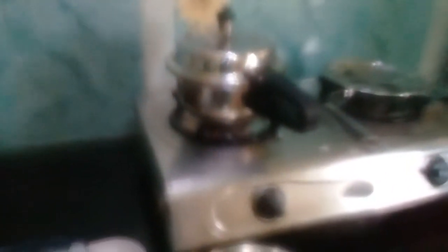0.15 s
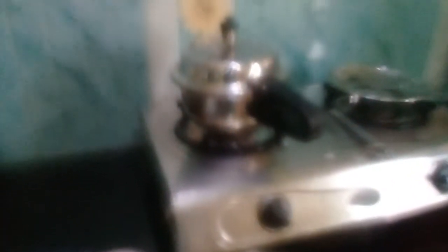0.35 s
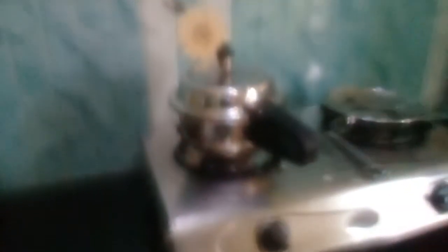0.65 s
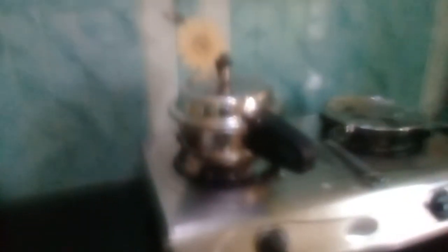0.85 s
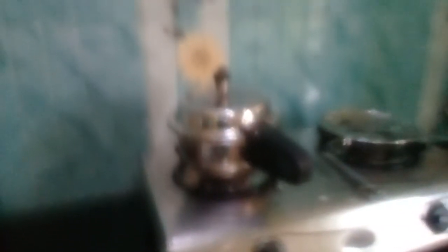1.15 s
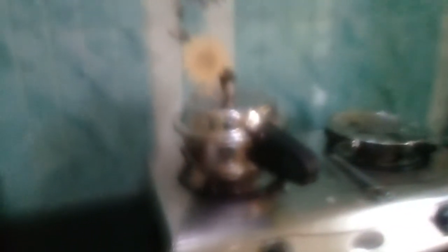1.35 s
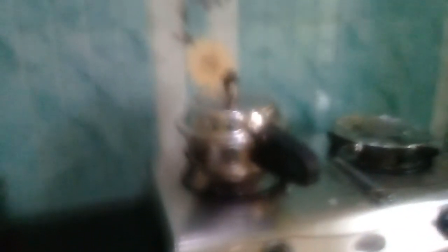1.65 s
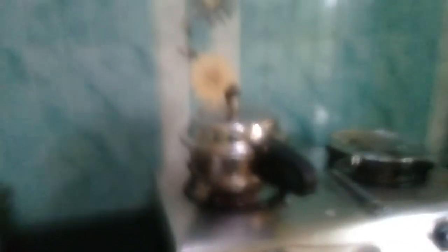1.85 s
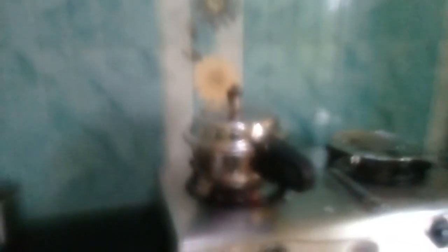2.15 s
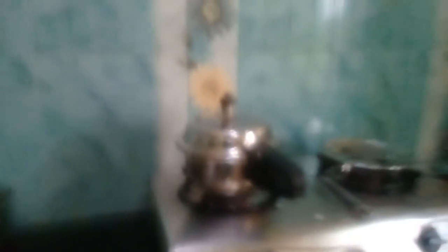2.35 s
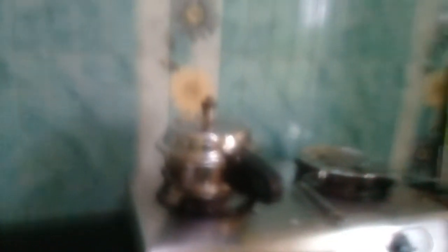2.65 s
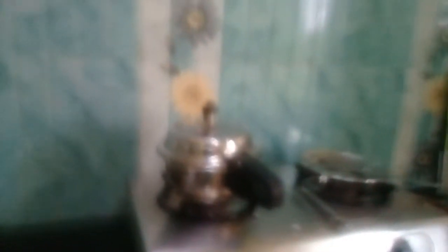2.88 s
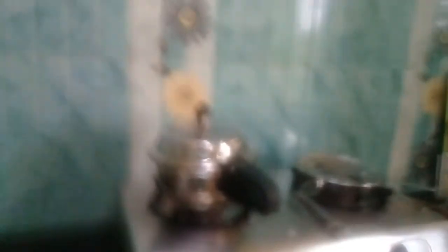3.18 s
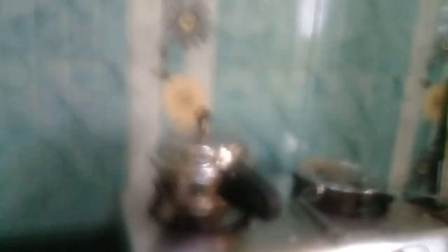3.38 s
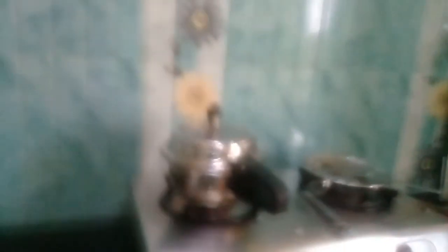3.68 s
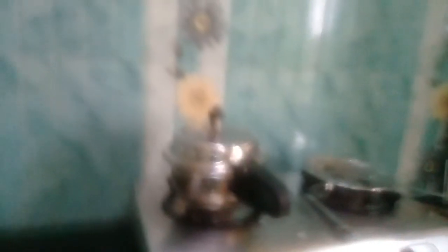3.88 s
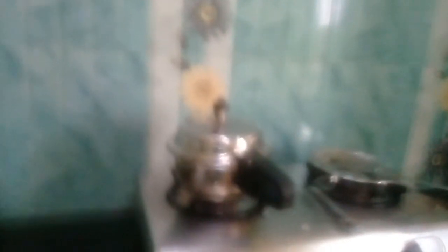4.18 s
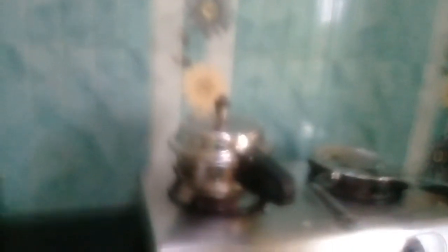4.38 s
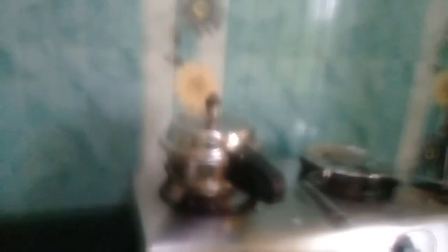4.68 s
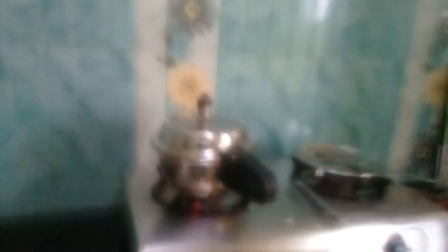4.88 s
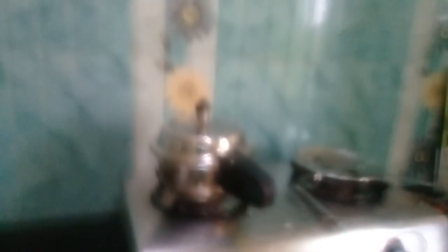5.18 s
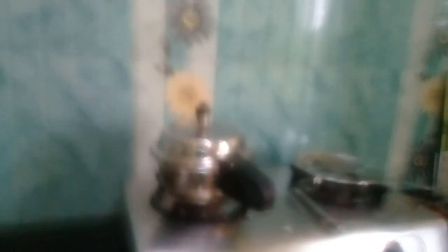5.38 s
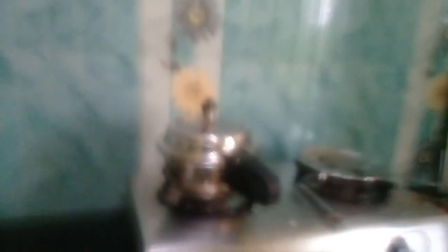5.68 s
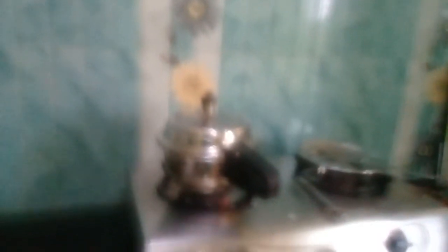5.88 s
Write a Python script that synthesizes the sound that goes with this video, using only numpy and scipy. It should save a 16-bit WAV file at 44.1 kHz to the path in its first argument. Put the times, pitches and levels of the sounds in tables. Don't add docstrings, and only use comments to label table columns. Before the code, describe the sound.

A pressure cooker heats on a gas stove in a tiled kitchen. A barely audible leak opens into a hiss that grows steadily, fluttering as the vent weight rocks, with breathy wheezes now and then. Near the end come a cluster of soft wooden knocks and one sharper tap. Low mains hum, burner flutter and room air lie behind, heard by a handheld microphone.

```python
import sys
import numpy as np
from scipy import signal
from scipy.fft import rfft, irfft, next_fast_len
from scipy.io import wavfile
from scipy.ndimage import uniform_filter1d, map_coordinates

SR = 44100
rng = np.random.default_rng(int(sys.argv[2]) if len(sys.argv) > 2 else 0)


def to_wav(s):
    ch = np.atleast_2d(s).T
    pcm = np.round(np.clip(ch, -1, 1) * 32767)
    wavfile.write(sys.argv[1], SR, pcm.astype(np.int16))


def voltage_ratio(level):
    return 10 ** (np.asarray(level, float) / 20)


N = 265923

# t/s, level/dB
PRESSURE = [
    (0, -60),
    (.3, -57),
    (.8, -51.5),
    (1.3, -48.5),
    (1.7, -46),
    (2.5, -44),
    (3.5, -41.5),
    (4.5, -38.5),
    (6.03, -38),
]
# t/s, change of jet level/dB, half length/s
ROCKS = [(.752, -2, 0.019), (1.305, -2, 0.061), (1.46, 1.5, .015), (1.66, 1.5, .015), (1.72, -2, .017),
         (2.159, -2, .032), (2.323, 5, 0.011), (2.372, -1, .014), (2.61, -2.5, .014), (2.663, 1.8, .017),
         (2.765, 0.5, .014), (2.826, -3.5, .015), (2.88, 1.7, .015), (3.03, 0.5, .03), (3.66, -1, 0.023),
         (3.46, -1, .025), (3.715, 1.5, 0.012), (3.89, -3, .016), (3.99, 1.4, .031), (4.179, -3, .025),
         (4.377, -0.8, .019), (4.524, 3, .025), (4.6, -2, 0.011), (4.711, -1, 0.016), (4.81, 0, .02),
         (5.104, -0.5, .019), (5.18, 1.5, 0.013), (5.236, -2.4, .015), (5.89, 2.5, 0.02),
         (5.975, -2.5, 0.016)]
# t/s, change of level/dB, half length/s
BOIL = [
    (.95, 5.5, 0.26),
    (2.0, -4, .08),
    (2.55, 3, .1),
    (3.1, -2, .15),
    (3.85, 1, 0.11),
    (5.25, -1, 0.23),
    (5.9, 2, 0.11),
]
# t/s, change of level/dB, half length/s
SINGS = [
    (.95, 1, .12),
    (1.2, -6, 0.087),
    (2.15, -2, .1),
    (2.55, 3, .15),
    (3.3, 1, .15),
    (3.65, -8, .08),
]
# f/Hz, density level/dB
JET_SPECTRUM = [(4200, -29), (5000, -6.5), (5600, -3.5), (6130, -2), (7040, -1), (7810, -2.5), (9740, -1),
                (10400, -4), (11200, -8.5), (12500, -39)]
# f/Hz, density level/dB
THROAT_SPECTRUM = [(1400, -41), (1650, -8.5), (1850, -3.5), (2200, -5), (2650, -2), (3500, 1), (4500, 0.5),
                   (5100, -2.5), (6000, -10), (7500, -56)]
# f/Hz, density level/dB
ROAR_SPECTRUM = [(350, -24), (600, -7), (850, -5.5), (1120, 1.5), (1350, -0.5), (1550, -2.5), (1900, -8),
                 (3000, -76)]
# f/Hz, density level/dB
FIZZ_SPECTRUM = [(9500, -59), (10800, -2), (11500, -4), (12100, 2.5), (12700, -1.5), (13500, 1),
                 (14200, -5), (15000, -1), (15600, 2), (16000, -11)]
# f/Hz, width/Hz, level/dB
VENT_HOLLOWS = [(2104, 550, 4), (2390, 140, -2), (2666, 430, 2), (3600, 300, 1), (4476, 120, 2),
                (5100, 140, -2.5), (6270, 280, 3), (7000, 640, -1.5), (7700, 340, 4.5), (8260, 180, 4),
                (8400, 380, -0.5), (9170, 190, 2.5), (9890, 270, 3), (10500, 210, 1), (11600, 260, 7),
                (12500, 300, 5.5), (12940, 300, 4.5), (13770, 320, 5)]
# t of top/s, hold/s, level/dB, sag in mid hold/dB, rise/(dB per s)
WHEEZES = [
    (-.01, 0.0062, -48, -2, 120),
    (0.624, 0.25, -51.5, 3, 152),
    (1.8, 0.25, -49.5, 3, 93),
    (2.575, .01, -52, 4, 140),
    (3.38, 0.1, -54, 2.5, 260),
    (3.703, 0.042, -46, 3, 1500),
    (5.165, 0.11, -47.5, 3, 250),
]
# f/Hz, width/Hz, level/dB
GAPS = [
    [(2830, 177, -5), (3180, 120, -2.5), (3660, 140, -1.5), (4222, 130, -3.5), (4570, 330, -12.5)],
    [(2484, 180, -10), (2826, 82, 4), (3200, 440, -2.5), (3560, 140, 3), (4020, 120, -5), (4460, 320, -19)],
    [(2860, 230, -3), (3280, 250, -5), (3430, 130, -2), (3610, 120, -2.5), (4070, 55, -8)],
    [(2850, 85, 15), (3540, 150, 7.5)],
    [(2610, 110, 9), (3500, 180, -22)],
    [(2370, 680, 5), (3570, 830, 4), (4430, 600, 3)],
    [(2714, 300, 0), (3600, 1100, -1)],
]
# t/s, peak level/dB, f/Hz, t60/s
KNOCKS = [(4.339, -35, 397, 0.05), (4.339, -45, 150, 0.04), (4.347, -45, 405, 0.069),
          (4.38, -33, 423, 0.063), (4.403, -44, 450, 0.082), (4.414, -39.5, 465, 0.04),
          (4.427, -43.5, 402, 0.13), (4.475, -37, 500, 0.049), (4.513, -38, 385, 0.025),
          (5.7128, -27, 1154, 0.011), (5.716, -34.5, 1055, 0.03), (5.713, -41, 920, 0.044),
          (5.715, -39, 1330, 0.035), (5.72, -38, 1940, .022), (5.731, -38, 1000, 0.02),
          (5.748, -38, 1100, 0.024)]
# f/Hz, t60/s
TILES = [(200, 0.48), (2000, 0.94), (10000, 0.37)]
# f/Hz, width/Hz, level/dB
BURNER_HOLLOWS = [(200.6, 41.6, 0), (240, 61, -2.5), (258.8, 9.8, 2)]
# t/s, change of level/dB, half length/s
FLARES = [
    (0.314, 7, 0.27),
    (1.0, 5.4, 0.24),
    (1.467, 3.5, 0.44),
    (2.255, 7.5, 0.22),
    (2.982, 4.5, 0.19),
    (3.826, 8, 0.25),
    (4.385, 8.5, 0.19),
    (5.168, 3, 0.18),
    (5.812, 6, 0.28),
]
# f/Hz, density level/dB
AIR_SPECTRUM = [(15, -70), (30, -43), (62, -26), (85, -12.5), (193, -13), (475, -17), (580, -22),
                (800, -20.5), (1100, -27.5), (1500, -25.5), (2000, -31), (3000, -40), (6600, -120)]
# t/s, change of level/dB, half length/s
DRAUGHTS = [(.6, 2, 0.19), (1.7, 2, 0.14), (2.4, 2, 0.16), (2.92, 5, 0.14), (3.35, 3.5, 0.061),
            (3.62, -2.5, 0.055), (3.9, 4.5, .15), (5.2, -1, 0.13), (4.53, 9.5, 0.066), (4.8, 4, 0.11),
            (5.8, 1.5, .3)]
# t/s, level/dB, half length/s
LOW_SWELLS = [(0.061, 16, 0.11), (0.428, 3.5, 0.035), (0.561, 15, 0.096), (0.779, 10.3, 0.074),
              (1.024, 14, 0.093), (1.513, 9.1, 0.11), (1.782, 12.3, 0.059), (2.152, 12, 0.14),
              (2.547, 12.5, 0.066), (2.854, 13.5, 0.056), (3.101, 12, 0.059), (3.411, 14.1, 0.15),
              (3.754, 16.7, 0.092), (4.002, 15, 0.056), (4.319, 15.5, 0.12), (4.573, 12, 0.058),
              (4.876, 11, 0.104), (5.163, 15.5, 0.063), (5.482, 11, 0.13), (5.919, 13, 0.155)]
# t/s, level/dB, half length/s
HIGH_SWELLS = [(0.11, 7.9, 0.14), (0.375, 14, 0.15), (0.759, 17, 0.096), (1.051, 13.3, 0.1),
               (1.379, 11.5, 0.12), (1.796, 17, 0.08), (2.141, 13, 0.09), (2.486, 13.9, 0.094),
               (2.88, 18.3, 0.12), (3.27, 15.8, 0.075), (3.566, 15, 0.088), (3.766, 4.4, 0.139),
               (3.951, 12.5, 0.104), (4.121, 13.6, 0.072), (4.352, 11, 0.098), (4.662, 10.6, 0.15),
               (4.987, 7.5, 0.041), (5.172, 11.5, 0.14), (5.53, 18, 0.064), (5.841, 15.9, 0.15)]


def steam():
    (jet_db,) = curves(PRESSURE)
    rock_db, boil_db = swells(ROCKS), swells(BOIL)
    lack_db = jet_db + 38
    shut = 1 - past(jet_db, -56.5, 4.5)
    flutter = 0.49 * wobble(21.64) + 0.5 * wobble(45)

    def layer(spectrum, patchy_db):
        return rush(lambda f: voltage_ratio(along(spectrum, f)), patchy_db)

    jet = voltage_ratio(jet_db + 1.06 * rock_db + flutter) * layer(JET_SPECTRUM, patchy_db=0.75)

    throat_db = -46.5 + 0.83 * lack_db + 0.89 * rock_db + 0.32 * boil_db - 4 * shut + 2.3 * flutter
    throat = voltage_ratio(throat_db) * layer(THROAT_SPECTRUM, patchy_db=1.37)

    fizz_db = -49 + 1.18 * lack_db + 0.95 * rock_db - 3 * shut + 1.6 * flutter
    fizz = voltage_ratio(fizz_db) * layer(FIZZ_SPECTRUM, patchy_db=1.2)

    roar_db = -58 + 1.18 * lack_db + 0.3 * rock_db + boil_db - 12 * shut + 0.78 * flutter
    roar = voltage_ratio(roar_db) * layer(ROAR_SPECTRUM, patchy_db=0.7)

    drowned = past(jet_db, -41.2, 0.4)
    rim_db = jet_db + rock_db - 11.4 + swells(SINGS) - 14 * drowned
    whistle = voltage_ratio(rim_db) * rush(lambda f: resonances([(5950, 1260, 0)], f) ** 2, patchy_db=2.4)

    def hollows(f):
        peaks_db = sum(db / (1 + ((f - c) / w * 2) ** 2) for c, w, db in VENT_HOLLOWS)
        return voltage_ratio(peaks_db - 1.37)

    return filtered(jet + throat + roar + fizz + whistle, hollows)


def wheeze():
    out, t = np.zeros(N), np.arange(N) / SR
    for (top_s, hold, db, sag_db, rise), gaps in zip(WHEEZES, GAPS):
        fall = min(0.87 * rise, 500)
        before, after = np.maximum(top_s - t, 0), np.maximum(t - top_s - hold, 0)
        sag = sag_db * np.sin(np.pi * np.clip((t - top_s) / hold, 0, 1))
        level_db = db - rise * before - fall * after - sag

        def pipe(f):
            return resonances(gaps, f) * resonances([(3500, 4600, 0)], f)

        sputter = voltage_ratio(0.4 * wobble(60))
        out += voltage_ratio(level_db) * unit(sputter * rush(pipe, patchy_db=1.0))
    return out


def knocks():
    out, t = np.zeros(N + SR), np.arange(SR // 4) / SR
    spread = rng.uniform(-1.3, 1, (len(KNOCKS), 2))
    for (s, db, hz, t60), off in zip(KNOCKS, spread):
        neighbours = np.sin(2 * np.pi * hz * np.outer(1 + 0.24 * off, t)).sum(0)
        ring = np.sin(2 * np.pi * hz * t) + 0.35 * neighbours
        soft_onset = 1 - np.exp(-t / 0.0029)
        out[round(s * SR):][:len(t)] -= voltage_ratio(db - 60 * t / t60) * soft_onset * ring
    return out[:N]


def kitchen(x):
    sway = 22050
    out = np.zeros(N + 5 * sway)
    padded = np.pad(x, (sway + 200, 2 * sway), "reflect")
    fade = np.sin(np.pi * np.arange(2 * sway) / (2 * sway))
    hz, t, z = signal.stft(rng.standard_normal((N // sway + 3, SR // 2)), SR, nperseg=256)
    decay = voltage_ratio(-60 * t / along(TILES, hz)[:, None])
    tails = signal.istft(z * decay, SR, nperseg=256)[1]
    tails = 0.7 * tails[0] + 0.7 * tails[1:]
    for k, tail in enumerate(tails):
        piece = fade ** 1.5 * padded[k * sway:][:2 * sway]
        answer = signal.fftconvolve(piece, tail / np.linalg.norm(tail))
        out[k * sway:][:len(answer)] += answer
    return out[sway:][:N]


def drone():
    def line(hz, drift):
        return np.sqrt(2) * np.sin(2 * np.pi * np.cumsum(hz + drift * wobble(8)) / SR)

    low = voltage_ratio(-74 + swells(LOW_SWELLS) + 1.1 * wobble(11)) * line(99, 1.53)
    high = voltage_ratio(-76.5 + swells(HIGH_SWELLS) + 1.1 * wobble(13)) * line(149.5, 3.28)

    def burner_body(f):
        return resonances(BURNER_HOLLOWS, f) * resonances([(210, 510, 0)], f)

    burner = voltage_ratio(-69 + 1.4 * swells(FLARES)) * rush(burner_body, patchy_db=0.0)
    rumble = voltage_ratio(-69) * rush(lambda f: resonances([(38.2, 21.3, 0)], f) ** 2, patchy_db=2.5)
    air = voltage_ratio(-62 + swells(DRAUGHTS)) * rush(lambda f: voltage_ratio(along(AIR_SPECTRUM, f)), patchy_db=1.5)
    return low + high + rumble + burner + air


def splits(mono, top_hz):
    hz, t, z = signal.stft(mono, SR, nperseg=1024)
    mask, lowest_hz = np.zeros(z.shape), 4150
    for k, (late, place, size) in enumerate(rng.random((30, 3))):
        s = (k + late) * 0.24
        low = lowest_hz * (top_hz / lowest_hz) ** place
        band = (hz > low) & (hz < low * 1.17)
        moment = np.clip(1 - ((t - s) / 0.013) ** 2, 0, 1)
        mask += voltage_ratio(1.2 - 3.1 * size) * np.outer(band, moment)
    power = uniform_filter1d(uniform_filter1d(np.abs(z) ** 2, size=9, axis=0), size=3, axis=1)
    level = np.sqrt(np.abs(power))
    noise = signal.stft(rng.standard_normal(N), SR, nperseg=1024)[2]
    noise = noise / np.sqrt(np.mean(np.abs(noise) ** 2))
    return signal.istft(mask * level * noise, SR, nperseg=1024)[1][:N]


def rush(response, patchy_db):
    z = signal.stft(rng.standard_normal(N), nperseg=512)[2]
    field = uniform_filter1d(uniform_filter1d(rng.standard_normal(z.shape), 8, 0), 14, 1)
    patchy = signal.istft(z * voltage_ratio(patchy_db * unit(field)), nperseg=512)[1][:N]
    return unit(filtered(patchy, response))


def resonances(modes, f):
    return sum((-1) ** k * voltage_ratio(db) * 1j * f * w / (c * c - f * f + 1j * f * w)
               for k, (c, w, db) in enumerate(modes))


def filtered(x, response):
    m = next_fast_len(N + SR // 2)
    return irfft(rfft(x, m) * response(np.fft.rfftfreq(m, 1 / SR)), m)[:N]


def swells(rows):
    t = np.arange(0, N + 64, 64) / SR
    total_db = sum(db * np.exp(-0.5 * ((t - s) / half) ** 2) for s, db, half in rows)
    return np.interp(np.arange(N) / SR, t, total_db)


def wobble(rate):
    return map_coordinates(rng.standard_normal(int(N * rate / SR) + 4), [np.arange(N) * rate / SR])


def past(x, edge, over):
    return 0.5 + 0.5 * np.tanh((x - edge) / over)


def curves(rows):
    s, *cols = np.transpose(rows)
    return [np.interp(np.arange(N) / SR, s, c) for c in cols]


def along(points, hz):
    f, v = np.transpose(points)
    return np.interp(np.log(hz + 1), np.log(f + 1), v)


def unit(x):
    return x / np.sqrt(np.mean(x ** 2) + 1e-20)


def scene():
    near = steam() + wheeze() + voltage_ratio(-22) * knocks()
    mono = near + voltage_ratio(-6) * kitchen(near) + knocks() + drone()
    return np.array([mono, mono])


def roll_off(x):
    return signal.sosfilt(signal.butter(12, 16650, fs=SR, output="sos"), x)


def record(dry):
    top_hz = 15730
    mono = filtered(dry[0], lambda hz: hz < top_hz)
    apart = splits(mono, top_hz)
    mix = np.array([mono + apart, mono - apart])
    return roll_off(mix)


dry = scene()
out = record(dry)
to_wav(out)
```